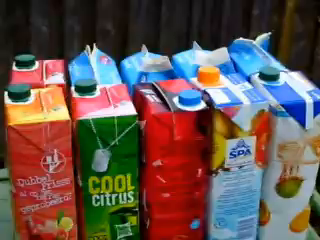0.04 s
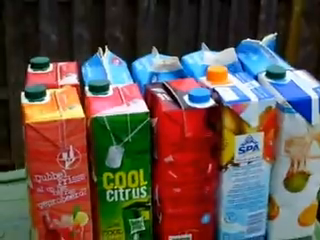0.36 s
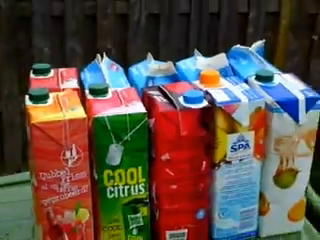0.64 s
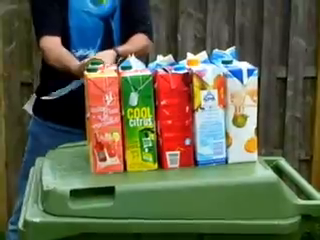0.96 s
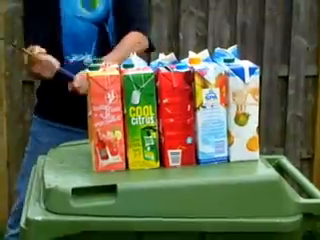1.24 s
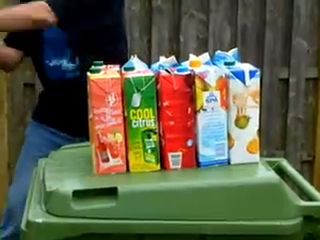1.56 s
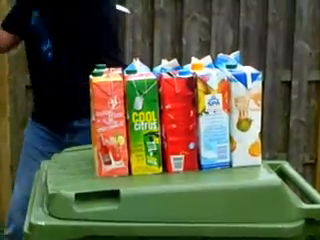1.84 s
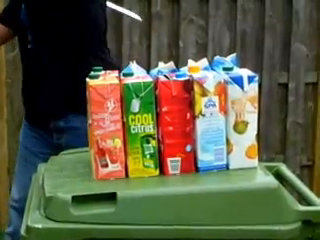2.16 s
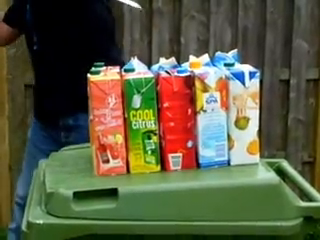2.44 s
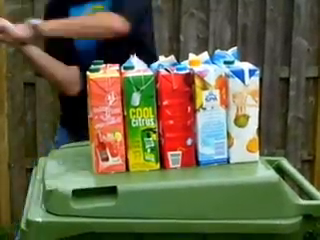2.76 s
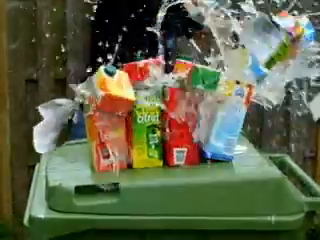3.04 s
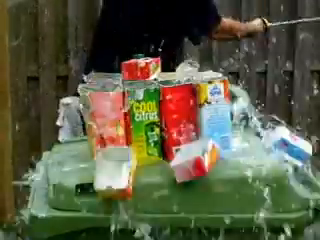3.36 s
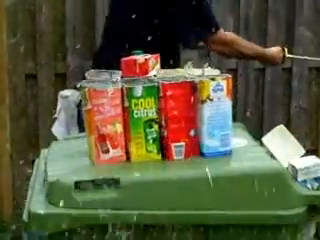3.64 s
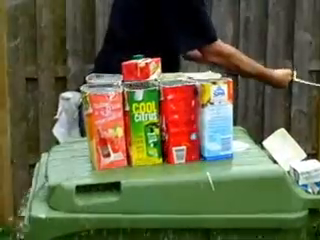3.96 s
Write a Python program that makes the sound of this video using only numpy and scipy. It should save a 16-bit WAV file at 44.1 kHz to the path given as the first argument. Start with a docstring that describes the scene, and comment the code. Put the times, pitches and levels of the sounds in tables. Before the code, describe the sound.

A sword slices through full drink cartons with a sharp crack, and liquid splashes down.

```python
"""A sword cuts five drink cartons

In a fenced yard, over recorder hiss, a thin whine, light wind and a few ticks, a sword is raised
with a soft whoosh. It swishes through five full cartons standing on a plastic bin, and they burst
one after another. Drink sprays, bubbles and drums on the lid and the ground, the cut-off tops
tumble down with hollow knocks, and a slab of falling drink makes the lid boom."""
import sys
import numpy as np
from scipy import signal
from scipy.io import wavfile
from scipy.ndimage import uniform_filter1d

SR = 44100
rng = np.random.default_rng(int(sys.argv[2]) if len(sys.argv) > 2 else 0)


def to_wav(s):
    """Save 16-bit WAV."""
    ch = np.atleast_2d(s).T  # columns
    pcm = np.round(np.clip(ch, -1, 1) * 32767)  # PCM
    wavfile.write(sys.argv[1], SR, pcm.astype(np.int16))


N = 176400
T = np.arange(N) / SR

# Tone of the recorder's hiss (frequency [Hz], relative level [dB])
HISS_SPECTRUM = [(200, -2), (450, -5), (700, -9), (2000, -14.5), (8200, -19.5), (11500, -24)]
# Thin tones of the recorder's whine (pitch [Hz], level [dB])
WHINE_TONES = [(7311, -80), (7988, -68), (11025, -77)]
# Tone of the wind on the microphone (frequency [Hz], relative level [dB])
WIND_SPECTRUM = [(10, -3), (50, 4.5), (120, -10), (400, -37), (1500, -70)]
# Loudness of the wind (time [s], level [dB])
WIND_LOUDNESS = [(.89, -65), (.897, -53), (1.55, -53), (1.95, -57.5), (2.15, -50.5), (2.45, -61)]
# Swirls of air bumping the microphone (time [s], peak level [dB], pitch [Hz])
WIND_BUMPS = [(1.045, -37.5, 205), (1.043, -39.5, 54), (1.095, -41, 82.5), (1.186, -39, 88),
              (1.321, -37.5, 56), (1.345, -34, 127), (1.402, -43.5, 70.6), (1.476, -38.5, 99),
              (1.542, -41.5, 164), (1.878, -43, 60.4), (2.222, -38.5, 116), (2.361, -46.5, 129),
              (2.532, -39, 81)]
# Small dry ticks (time [s], relative level [dB], treble limit [Hz])
DRY_TICKS = [(1.1445, -28.5, 9000), (1.3772, -24, 4000), (1.8775, -31, 5000), (3.0437, -4, 12000)]
# Tone of the ticks (frequency [Hz], relative level [dB])
TICK_SPECTRUM = [(60, -20), (600, 6), (10000, -4.5)]
# Loudness of the rustle as the stroke starts (time [s], level [dB])
RUSTLE_LOUDNESS = [(2.757, -56), (2.763, -42.5), (2.802, -39.5), (2.812, -52.5), (2.9, -75)]
# Tone of that rustle (frequency [Hz], relative level [dB])
RUSTLE_SPECTRUM = [(400, -19), (770, -5.5), (1300, -11), (1750, 4), (2600, -8), (4500, -4), (5600, -13),
                   (7500, -1.5), (11800, -26)]
# Tone of the air rushing past the blade (frequency [Hz], relative level [dB])
RUSH_SPECTRUM = [(60, -11), (900, 1.5), (1700, 1), (3500, -8.5), (7000, -6.5), (11000, -29)]
# The blade bursts each carton (time [s], level [dB], energy fade time [s])
CARTON_BURSTS = [(2.9305, -2, 0.0066), (2.94, -11, 0.0032), (2.9467, -8.5, 0.013), (2.954, -9.5, 0.014),
                 (2.96, -24.5, 0.04)]
# Tone of the tearing cartons (frequency [Hz], relative level [dB])
TEAR_SPECTRUM = [(55, -29.5), (100, -9.5), (270, -13.5), (460, -16.5), (580, -5.5), (880, -9), (1500, -7),
                 (2000, -8.5), (3300, -5), (4200, -11.5), (5400, -8), (8200, -9), (11500, -30.5),
                 (15000, -26)]
# Ringing of the cartons on the bin (pitch [Hz], relative level [dB], time to fade by 60 dB [s])
CARTON_TONES = [(393.8, -9.5, 0.3), (573, 9.5, 0.1), (665, 0.5, 0.18), (839, -9, 0.34), (997, 2, 0.18),
                (1150, 7.5, 0.11), (1333, 3, 0.13), (1490, 4.5, 0.12)]
# Loudness of the spray of fine drops (time [s], level [dB])
SPRAY_LOUDNESS = [(2.95, -45), (2.99, -62), (3.085, -62), (3.12, -35.5), (3.2, -37), (3.26, -27.5),
                  (3.35, -33), (3.42, -29), (3.5, -28.5), (3.56, -24), (3.63, -24), (3.655, -35.5),
                  (3.9, -40), (3.94, -31.5), (4, -45)]
# Tone of the spray (frequency [Hz], relative level [dB])
SPRAY_SPECTRUM = [(900, -13.5), (2000, -7.5), (3200, -1), (4500, -5), (5700, -1.5), (8300, 0),
                  (10000, -7.5), (11000, -16), (12000, -20)]
# Loudness of the heavier splashes on the lid (time [s], level [dB])
SPLASH_LOUDNESS = [(2.95, -27), (2.99, -27), (3.09, -41.5), (3.118, -40.5), (3.19, -47.5), (3.27, -38),
                   (3.445, -34), (3.475, -28.5), (3.51, -36), (3.62, -36), (3.68, -43.5), (3.88, -51)]
# Tone of the splashes (frequency [Hz], relative level [dB])
SPLASH_SPECTRUM = [(25, -25), (110, -6), (260, 0), (480, -2.5), (680, 0), (950, -1.5), (1500, -1.5),
                   (2100, -14), (4000, -37)]
# The whole sound dips briefly (time [s], level change [dB])
LEVEL_DIP = [(3.088, 0), (3.091, -18), (3.101, -20), (3.104, -45), (3.11, -45), (3.113, 0)]
# Tops and gulps of drink landing (time [s], level [dB], pitch [Hz], time to fade by 60 dB [s])
LANDINGS = [(3.113, -28, 740, 0.053), (3.336, -13, 495, 0.015), (3.366, -13, 654, 0.028),
            (3.399, -12.5, 687, 0.049), (3.467, -16, 215, 0.032), (3.527, -16.5, 590, 0.023),
            (3.789, -25.5, 786, 0.026), (3.931, -26, 718, 0.03)]
# Hollow tones within each landing (multiple of its pitch, relative level [dB])
KNOCK_TONES = [(.55, -9), (1, 0.5), (1.6, -6), (2.2, -26)]
# Large drops (time [s], level [dB], pitch [Hz], time to fade by 60 dB [s])
LARGE_DROPS = [(3.1622, -13.5, 5900, 0.005), (3.2258, -11, 6630, 0.007), (3.4528, -12.5, 1420, .014),
               (3.468, -20, 3400, 0.012), (3.744, -26, 2210, 0.0086), (3.7898, -22.5, 4450, 0.011)]
# Low tones of the plastic lid (pitch [Hz], relative level [dB])
LID_TONES = [(288, -2), (327, 1), (389, 0.5)]

NOISE_ON_S = .13  # hiss, buzz, whine and wind are silent before this
FIRST_CUT_S = CARTON_BURSTS[0][0]
GLIDE_PER_S = 4  # drops and bubbles rise by this many times their starting pitch each second


def amp(db):
    """Turns decibels into a number to multiply a sound by."""
    return 10 ** (np.asarray(db) / 20)


def unit(x):
    """Scales a sound to an average strength (rms) of 1."""
    return x / np.sqrt(np.mean(x ** 2) + 1e-20)


def level(points):
    """A loudness curve through (time, dB) points, silent before the first."""
    return amp(np.interp(T, *np.transpose(points), left=-140))


def add(mix, start_s, sound):
    """Mixes a sound in at the given time."""
    part = mix[round(start_s * SR):][:len(sound)]
    part += sound[:len(part)]


def lowpass(x, hz, order=2):
    """Softens everything above the given frequency."""
    return signal.sosfilt(signal.butter(order, hz, fs=SR, output="sos"), x)


def colour(x, spectrum):
    """Gives a sound the tone of a (Hz, dB) table; white noise keeps its strength."""
    hz, db = np.transpose(spectrum)
    log_hz = np.log(abs(np.fft.fftfreq(4096, 1 / SR)) + 1)
    log_gain = np.interp(log_hz, np.log(hz), db) * np.log(10) / 20
    response = np.exp(np.conj(signal.hilbert(log_gain)))  # rings after a click, never before it
    taps = np.fft.ifft(response).real[:len(log_gain) // 2]
    return signal.fftconvolve(x, taps / np.linalg.norm(taps))[:len(x)]


def clicks(per_s, spread_db):
    """Random clicks of uneven size, with an average strength of 1."""
    size = amp(spread_db * np.minimum(rng.exponential(1, N), 4))
    return unit(size * rng.choice([-1, 1], N) * (rng.random(N) < per_s / SR))


def recorder_noise(louder_s=.897, buzz_hz=1378.1):
    """The recorder's own hiss, faint buzz and thin whine; hiss and whine step up once."""
    early = T < louder_s
    hiss = amp(-64 - 2 * early) * colour(rng.standard_normal(N), HISS_SPECTRUM)
    buzz = sum(np.sin(2 * np.pi * (k * buzz_hz * T + rng.random())) / np.sqrt(k) for k in range(1, 8))
    whine = sum(amp(db - 7.5 * early) * np.sin(2 * np.pi * hz * T) for hz, db in WHINE_TONES)
    return (T > NOISE_ON_S) * (hiss + np.sqrt(2) * (amp(-78.5) * buzz + whine))


def wind(lump_db=4.5, bump_cycles=.4):
    """Wind makes a lumpy low rumble, and single swirls of air bump the microphone."""
    lumps = amp(lump_db * unit(lowpass(rng.standard_normal(N), hz=22)))
    out = level(WIND_LOUDNESS) * unit(lumps * colour(rng.standard_normal(N), WIND_SPECTRUM))
    for peak_s, db, hz in WIND_BUMPS:
        cycles = (T - peak_s) * hz
        swell = np.exp(.5 - np.hypot(cycles / bump_cycles, .5))
        out += amp(db) * swell * np.cos(2 * np.pi * (cycles + rng.random()))
    return out * (T > NOISE_ON_S)


def ticks():
    """Single dry clicks close to the microphone, some duller than others."""
    out = np.zeros(N)
    for start_s, db, top_hz in DRY_TICKS:
        add(out, start_s, amp(db) * lowpass(signal.unit_impulse(SR), top_hz, order=4))
    return colour(out, TICK_SPECTRUM)


def sword_lift(fastest_s=1.714, rise_s=.083, fall_s=.15, tip_hz=960):
    """The rising blade sheds swirls of air; the faster it moves, the louder and higher they sound."""
    hz, t, noise = signal.stft(rng.standard_normal(N), SR, nperseg=512)
    age = t - fastest_s
    speed = np.exp(-(age / np.where(age < 0, rise_s, fall_s)) ** 2 / 2)
    top_hz = 1 + tip_hz * np.sqrt(speed)
    treble_cut = 1 / np.hypot(1, (hz[:, None] / top_hz) ** 8)
    whoosh = signal.istft(noise * treble_cut * speed ** 2, SR, nperseg=512)[1]
    return amp(-42.5) * whoosh[:N]


def sword_swing(rush_rise_s=.029, whistle_s=.035):
    """A rustle, then rushing air and a whistle from the edge that climbs until the blade lands."""
    rustle = level(RUSTLE_LOUDNESS) * colour(rng.standard_normal(N), RUSTLE_SPECTRUM)
    time_left = np.maximum(FIRST_CUT_S - T, 0)
    swell = np.exp(-(time_left / rush_rise_s) ** 2 / 2)
    rush = amp(-46) * swell * colour(rng.standard_normal(N), RUSH_SPECTRUM)
    whistle_hz = np.interp(time_left, [0, whistle_s], [6800, 5750])
    tone = np.exp(2j * np.pi * np.cumsum(whistle_hz) / SR)
    flutter = unit(lowpass(rng.standard_normal((2, N)), hz=130))
    breathy_tone = ((flutter[0] + 1j * flutter[1]) * tone).real
    whistle = amp(-49) * np.exp(-(time_left / whistle_s) ** 6) * breathy_tone
    return (rustle + rush + whistle) * (time_left > 0)


def carton_cut(bite_s=.0029, tear_rise_s=.00077, ring_rise_s=.017):
    """The edge bites, each carton tears in a dense crackle, and the row rings."""
    force = amp(-13.5) * (T > FIRST_CUT_S - bite_s) * (T < FIRST_CUT_S)
    for start_s, db, fade_s in CARTON_BURSTS:
        age = np.maximum(T - start_s, 0)
        burst = amp(db) * np.minimum(age / tear_rise_s, 1) * np.exp(-age / fade_s / 2)
        force = np.hypot(force, burst)  # their energies add up
    tear = colour(force * clicks(per_s=9000, spread_db=.5), TEAR_SPECTRUM)
    age = np.maximum(T - FIRST_CUT_S, 0)
    ring = sum(amp(db - 60 * age / ring_s) * np.sin(2 * np.pi * (hz * age + rng.random()))
               for hz, db, ring_s in CARTON_TONES)
    return tear + amp(-12.5) * (1 - np.exp(-age / ring_rise_s)) * ring


def spray(fade_s=.00045):
    """Each fine drop breaks in a tiny burst of fizz."""
    drops = clicks(per_s=2200, spread_db=3.5)
    fading_energy = signal.lfilter([1], [1, -np.exp(-1 / (fade_s * SR))], drops ** 2)
    fizz = unit(np.sqrt(fading_energy) * rng.standard_normal(N))
    return colour(level(SPRAY_LOUDNESS) * fizz, SPRAY_SPECTRUM)


def splashes():
    """Heavier splashes drum on the lid."""
    return colour(level(SPLASH_LOUDNESS) * clicks(per_s=2400, spread_db=3), SPLASH_SPECTRUM)


def rising_tone(hz, t):
    """The slightly climbing note of a drop or bubble."""
    return np.sin(2 * np.pi * hz * t * (1 + GLIDE_PER_S * t / 2))


def bubbles(sizes=32, per_s=420, low_hz=1285, high_hz=9170, fade_cycles=6):
    """Tiny bubbles of many sizes ring at random, louder when there is more spray."""
    out, t = np.zeros(N), T[:SR // 30]
    for hz in np.geomspace(low_hz, high_hz, sizes):
        age = t * hz / fade_cycles
        ring = np.sqrt(age) * np.exp(-age) * rising_tone(hz, t)
        out += np.sqrt(hz) * signal.oaconvolve(clicks(per_s / sizes, spread_db=2.5), ring)[:N]
    return amp(-9) * level(SPRAY_LOUDNESS) * unit(colour(out, SPRAY_SPECTRUM))


def knocks(rise_s=.0011, slap_s=.0067, bounce_s=.015, bounce_db=-11.5):
    """Carton tops and gulps of drink land with a wet slap, a short hollow ring and a weaker bounce."""
    out, t = np.zeros(N), T[:SR // 4]
    onset = np.minimum(t / rise_s, 1)
    for start_s, db, hz, ring_s in LANDINGS:
        ring = sum(amp(tone_db - 60 * t / ring_s) * np.sin(2 * np.pi * hz * multiple * t)
                   for multiple, tone_db in KNOCK_TONES)
        for delay_s, change_db in [(0, 0), (bounce_s, bounce_db)]:
            slap = amp(-7) * np.exp(-t / slap_s) * colour(rng.standard_normal(len(t)), SPLASH_SPECTRUM)
            add(out, start_s + delay_s, amp(db + change_db) * onset * (ring + slap))
    return out


def large_drops(rise_s=.001, roughness=.4):
    """Each large drop makes a short, rough plip that rises in pitch."""
    out, t = np.zeros(N), T[:SR // 20]
    for start_s, db, hz, ring_s in LARGE_DROPS:
        loudness = np.minimum(t / rise_s, 1) * amp(db - 60 * np.maximum(t - rise_s, 0) / ring_s)
        wobble = unit(uniform_filter1d(rng.standard_normal(len(t)), size=round(2 * SR / hz)))
        add(out, start_s, loudness * rising_tone(hz, t) * (1 + roughness * wobble))
    return out


def lid_boom(start_s=3.544, end_s=3.638, fade_s=.028, ring_s=.075):
    """A falling slab of drink pushes on the lid, hardest at first, and sets its low tones booming."""
    out, t = np.zeros(N), T[:SR // 3]
    push = np.exp(-t / fade_s) * (t < end_s - start_s)
    for hz, db in LID_TONES:
        ring = amp(-60 * t / ring_s) * np.sin(2 * np.pi * hz * t)
        boom = signal.fftconvolve(push * rng.standard_normal(len(t)), ring)
        add(out, start_s, amp(db - 17.5) * boom / abs(boom).max())
    return out


def yard_echo(x, delay_s=.01, ring_s=.41):
    """The bin and fence throw sound back, adding a thin, short tail."""
    t = T[:SR // 2]
    tail = rng.standard_normal(len(t)) * amp(-60 * t / ring_s) * (t > delay_s)
    return x + amp(-17) * signal.fftconvolve(x, tail / np.linalg.norm(tail))[:N]


def scene():
    """Everything reaches one microphone, so both channels are the same."""
    bass_cut = signal.butter(2, 112, "high", fs=SR, output="sos")  # small landings make no deep bass
    landings = signal.sosfilt(bass_cut, knocks() + lid_boom())
    sword = sword_lift() + sword_swing() + carton_cut()
    drink = spray() + splashes() + bubbles() + large_drops()
    mono = yard_echo(sword + drink + landings) + wind() + ticks() + recorder_noise()
    return np.array([mono, mono])


def record(dry):
    """The cut overloads, the level dips briefly just after it, and the highest treble is removed."""
    clipped = np.clip(dry * level([(0, 0)] + LEVEL_DIP), -1, 1)
    treble_cut = signal.firwin(255, 11950, window=("kaiser", 7), fs=SR)
    return signal.oaconvolve(clipped, treble_cut[None], "same")


dry = scene()
out = record(dry)
to_wav(out)
```